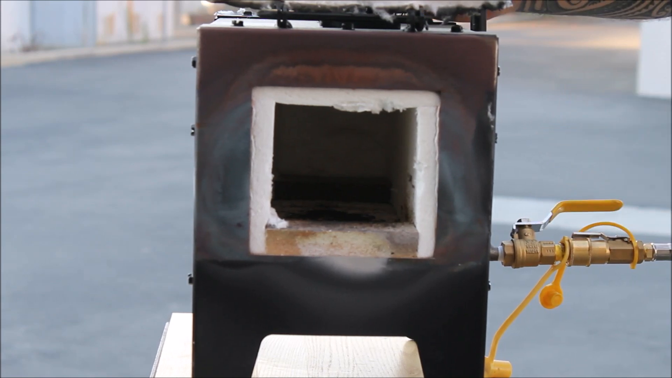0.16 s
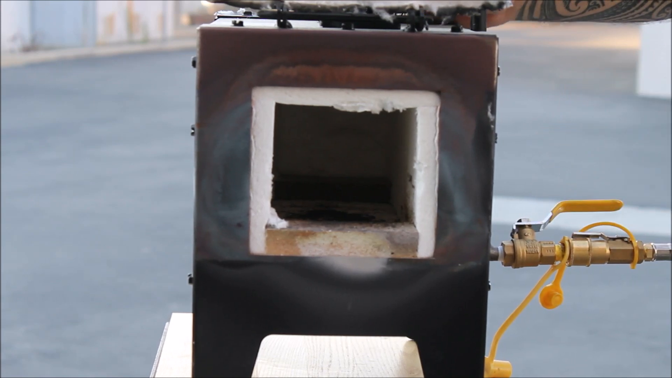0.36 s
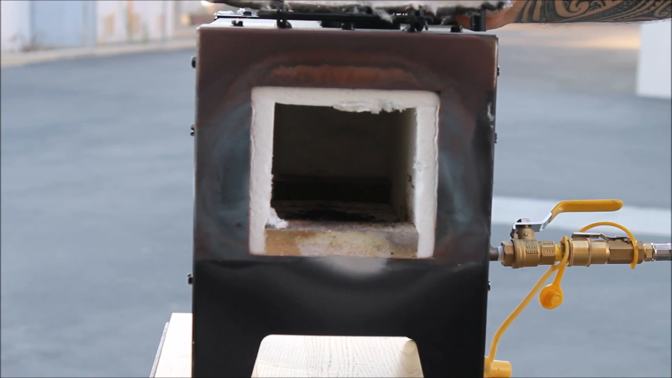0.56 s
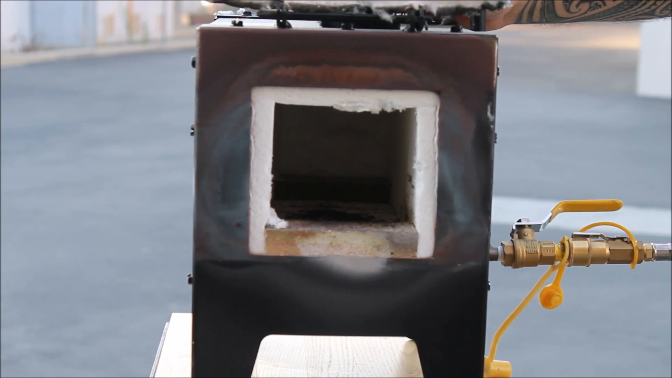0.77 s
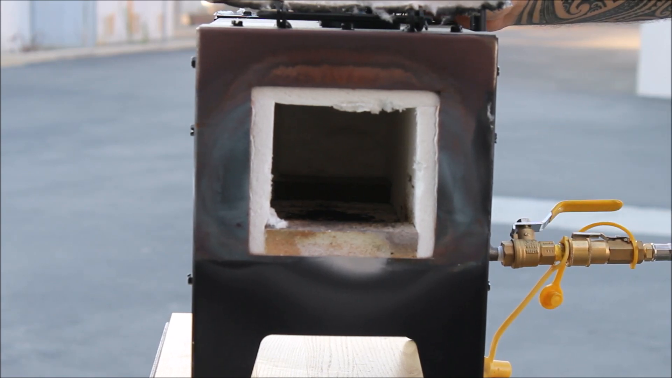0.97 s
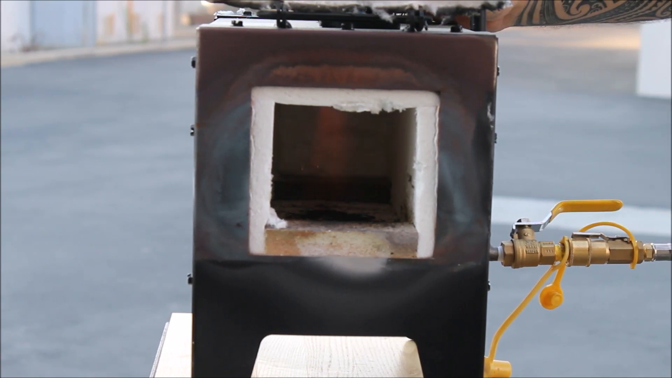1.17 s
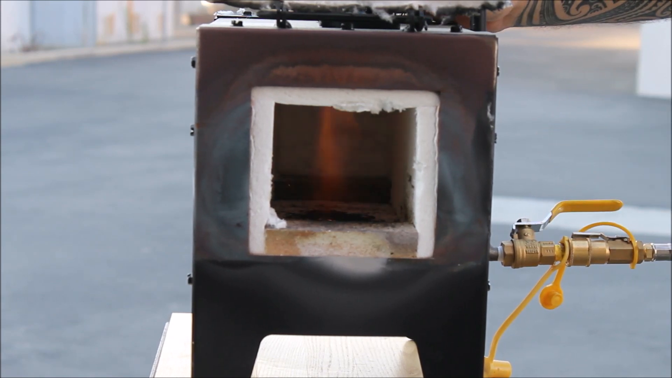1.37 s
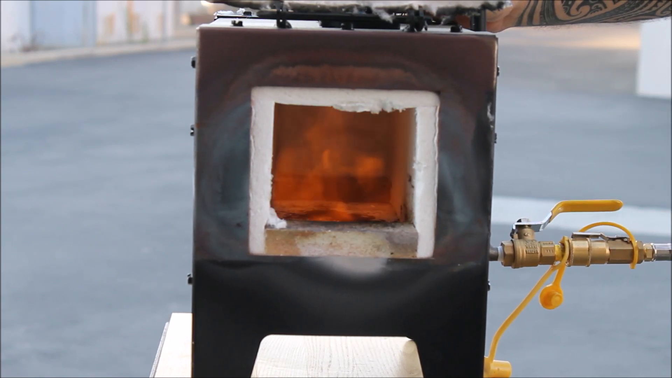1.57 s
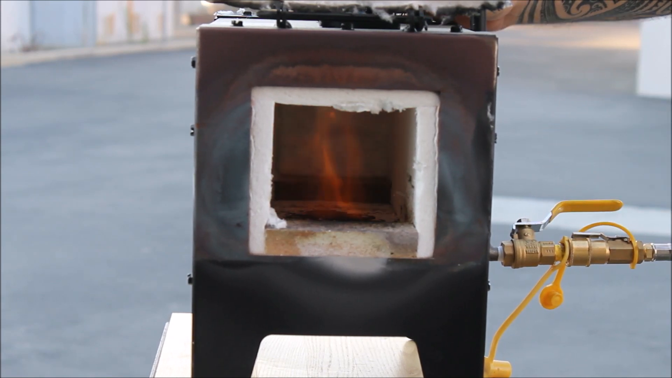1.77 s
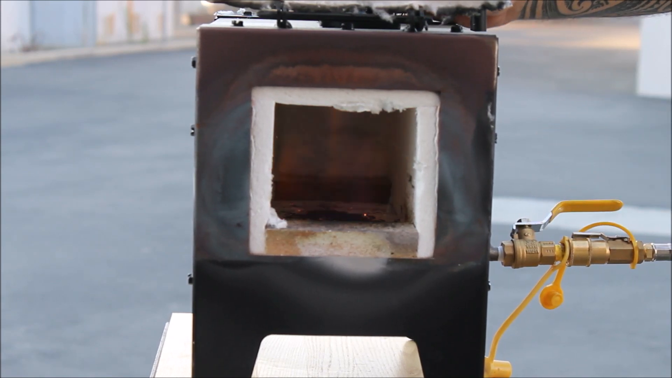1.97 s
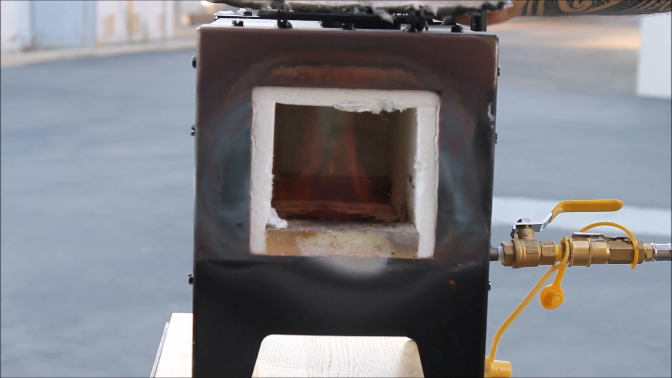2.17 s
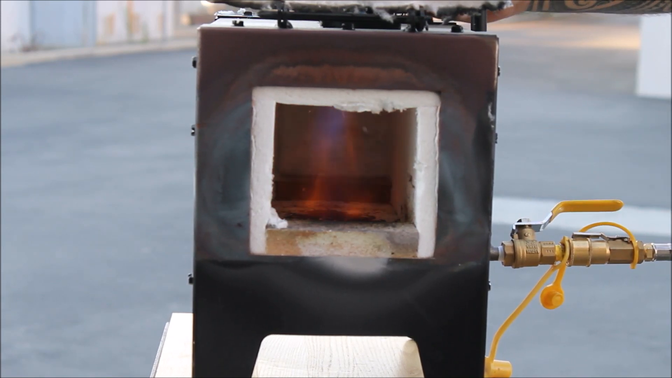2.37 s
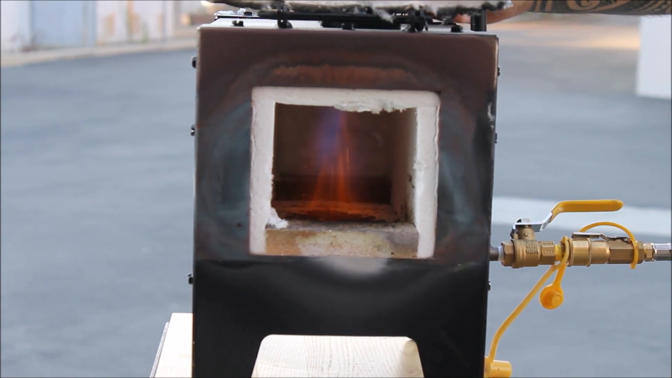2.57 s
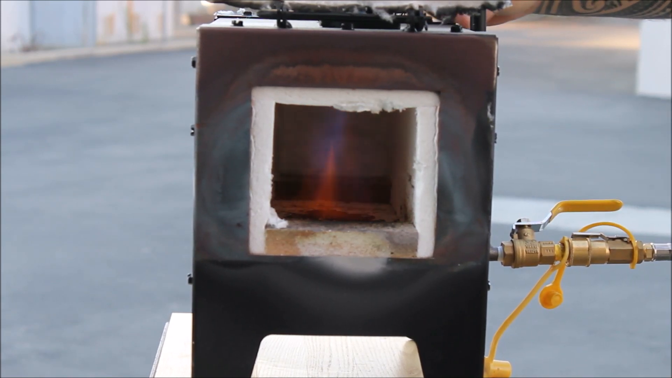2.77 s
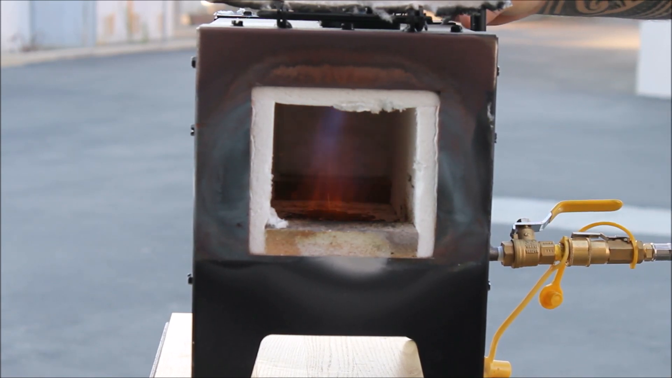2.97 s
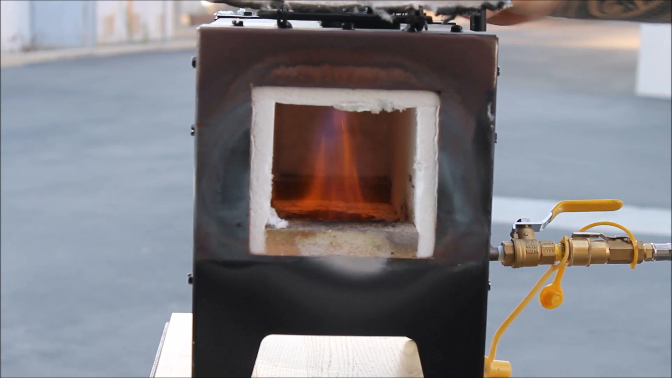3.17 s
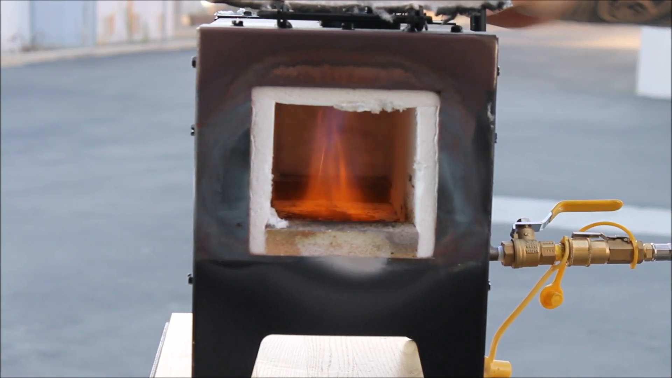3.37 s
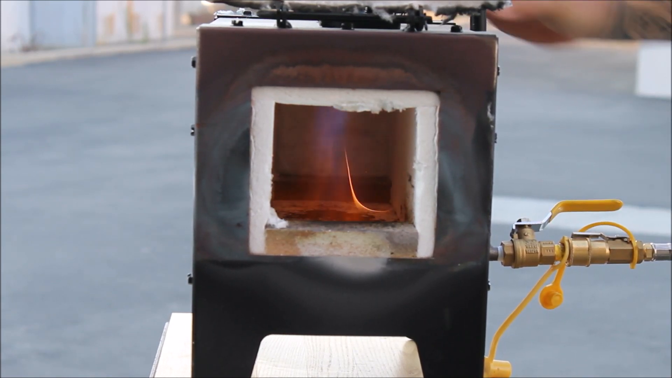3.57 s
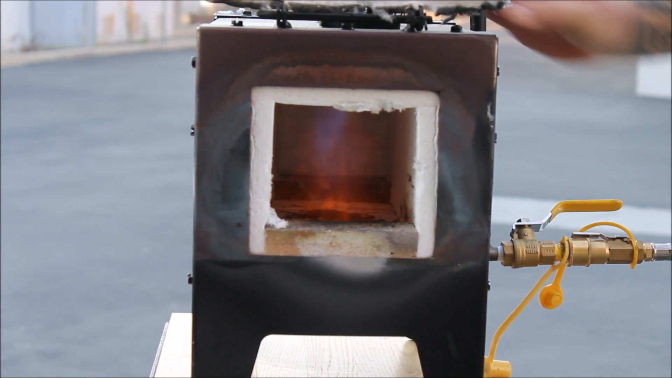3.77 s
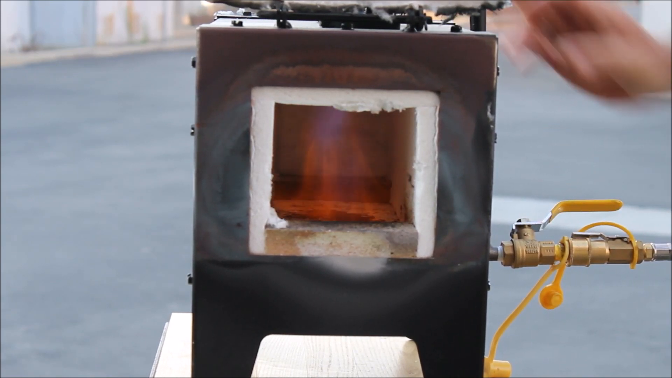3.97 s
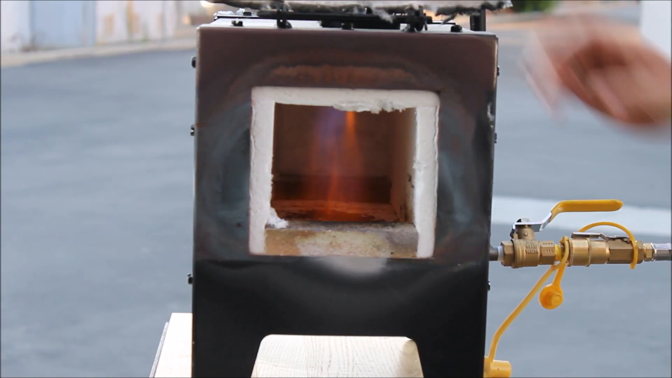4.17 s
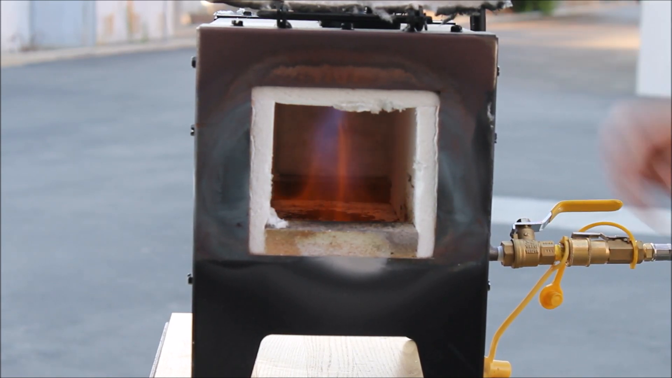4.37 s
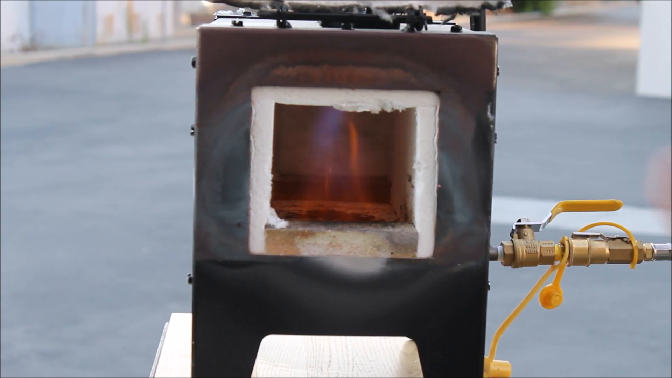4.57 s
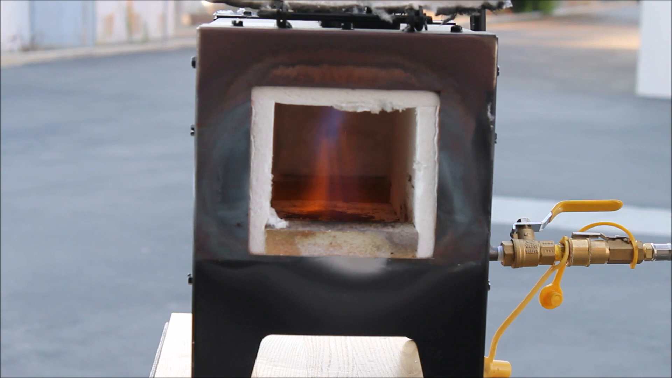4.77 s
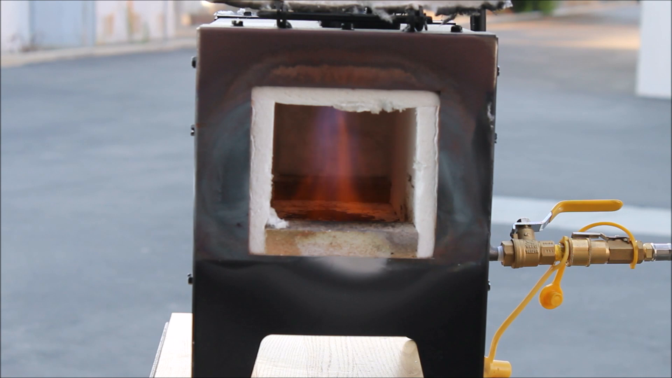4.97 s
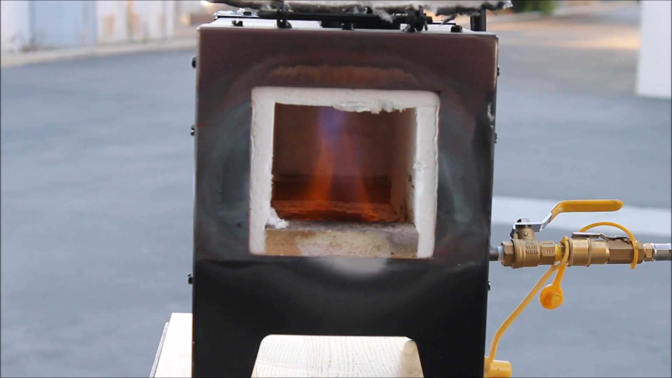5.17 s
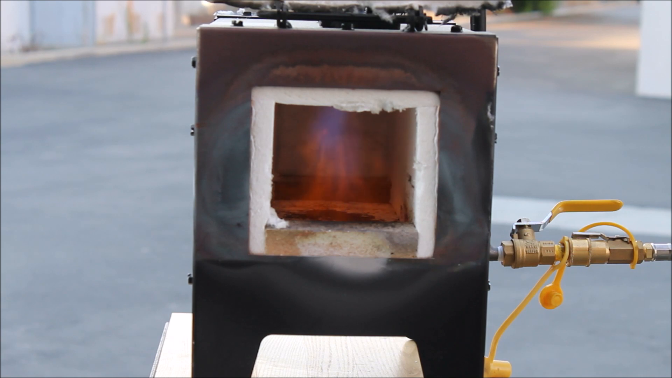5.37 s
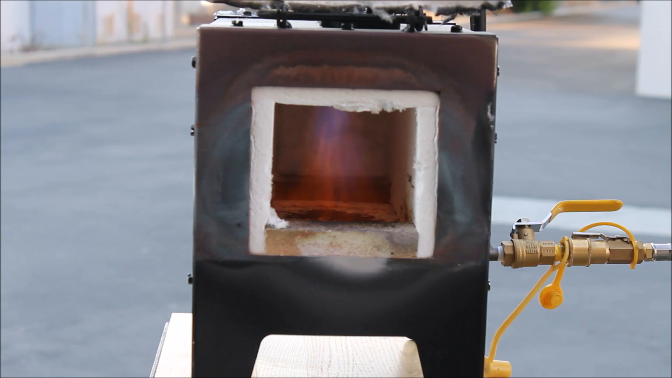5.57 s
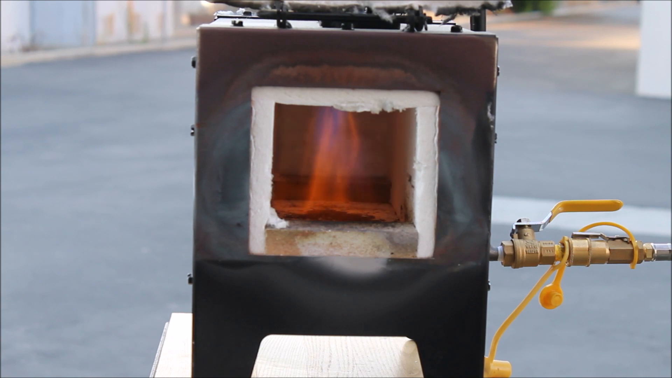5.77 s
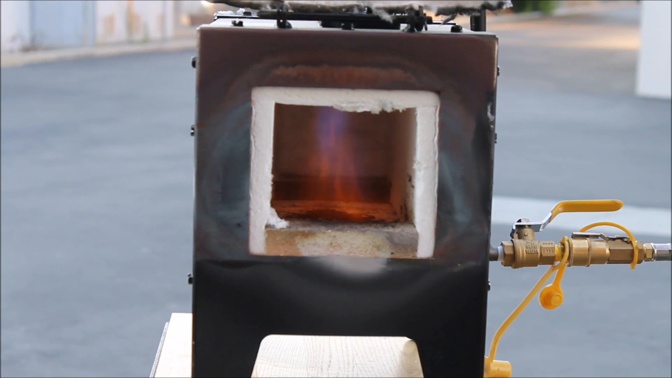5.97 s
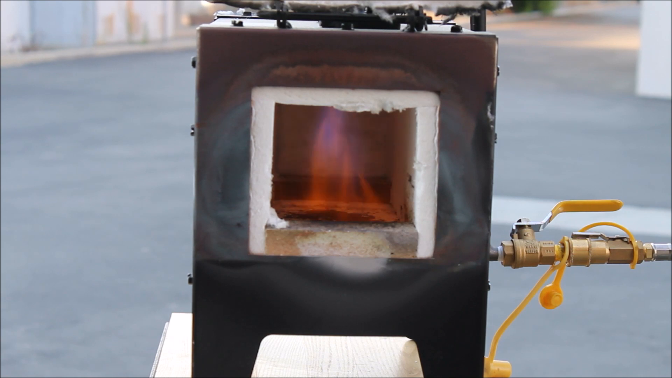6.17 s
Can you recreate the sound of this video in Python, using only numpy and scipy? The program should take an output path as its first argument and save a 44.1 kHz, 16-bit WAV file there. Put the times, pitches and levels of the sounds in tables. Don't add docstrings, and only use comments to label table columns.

```python
import sys
import numpy as np
from scipy import signal
from scipy.fft import rfft, irfft, next_fast_len
from scipy.io import wavfile
from scipy.ndimage import uniform_filter1d, map_coordinates

SR = 44100
rng = np.random.default_rng(int(sys.argv[2]) if len(sys.argv) > 2 else 0)


def ratio(d):
    e = np.asarray(d, float) / 20
    return 10 ** e


def put_to_file(sound):
    columns = np.atleast_2d(sound).T
    safe = np.clip(columns, -1, 1)
    whole_steps = np.round(safe * 32767)
    wavfile.write(sys.argv[1], SR, whole_steps.astype(np.int16))


N = 273861


def unit(x):
    return x / np.sqrt(np.mean(x ** 2) + 1e-20)


def along(points, hz):
    f, v = np.transpose(points)
    return np.interp(np.log(hz + 1), np.log(f + 1), v)


def curves(rows):
    s, *columns = np.transpose(rows)
    t = np.arange(N) / SR
    return [uniform_filter1d(np.interp(t, s, column), size=300) for column in columns]


def wobble(rate):
    knots = rng.standard_normal(int(N * 60 / SR) + 4)
    return map_coordinates(knots, [np.arange(N) * min(rate, 60) / SR])


def filtered(x, response):
    m = next_fast_len(len(x) + SR // 2)
    return irfft(rfft(x, m) * response(np.fft.rfftfreq(m, 1 / SR)), m)[:len(x)]


def modes(table, f):
    total = 0
    for k, (centre, width, db) in enumerate(table):
        damping = 1j * f * width
        total = total + (-1) ** k * ratio(db) * damping / (centre * centre - f * f + damping)
    return total


def noise(response, even=0.):
    x = filtered(rng.standard_normal(N), response)
    envelope = np.abs(signal.hilbert(unit(x), next_fast_len(N))[:N])
    return unit(x / (envelope + .25) ** np.clip(even, 0, 1))


# f/Hz, density level/dB per Hz
JET_SPECTRUM = [(20, -11), (60, -13), (100, -4), (400, -8), (700, -10.5), (2000, -19.5), (5000, -25),
                (7800, -26.5), (9300, -33.5), (10000, -42.5), (11000, -43.5), (13000, -53.5), (15400, -63),
                (15900, -76.5), (22000, -95), (30000, -140)]
# f/Hz, width/Hz, level/dB
WHISTLE = [(5790, 200, 0)]
# f/Hz, width/Hz, level/dB
OVERTONES = [(8070, 260, 0), (11600, 300, -12)]


def gas(hiss_db, whistle_db, slow, flutter_db, overtone_db):
    hiss = noise(lambda f: ratio(along(JET_SPECTRUM, f * slow)))
    hiss += ratio(overtone_db) * noise(lambda f: modes(OVERTONES, f * slow) ** 2)
    whistle = noise(lambda f: modes(WHISTLE, f * slow) ** 2, even=.6)
    whistle = filtered(whistle, lambda f: modes([(WHISTLE[0][0], 500, 0)], f * slow))
    hiss_gain = ratio(hiss_db + 4.5 + flutter_db * wobble(30 / slow))
    whistle_gain = ratio(whistle_db + 2.5 + 2.6 * wobble(70 / slow))
    return hiss_gain * hiss + whistle_gain * whistle


# t/s, level/dB
WHISTLING = [(.89, -58), (1.06, -43), (1.28, -61.5), (1.45, -46), (2.1, -51), (2.8, -50), (3.02, -52.5),
             (3.7, -55), (4.14, -62), (4.4, -55), (4.68, -46.5), (4.8, -54.5), (5.1, -51.5), (5.4, -45),
             (5.9, -49), (6.21, -50.5)]


def slowed_whistle_db():
    return curves(WHISTLING)[0]


SLOWED_HISS_DB, SWELL_DB, SWELL_S = -35.5, 2.5, 1.2
DUCK_DB, DUCK_FROM_S, DUCK_TAKES_S = 6, 1.9, 0.38
HISS_FOLLOWS, STEADY_WHISTLE_DB = 0.087, -50.5


def slowed_hiss_db():
    t = np.arange(N) / SR
    swell = SWELL_DB * np.clip((t - SWELL_S) / .1, 0, 1)
    ducked = np.clip((t - DUCK_FROM_S) / DUCK_TAKES_S, 0, 1)
    drift = HISS_FOLLOWS * uniform_filter1d(slowed_whistle_db() - STEADY_WHISTLE_DB, size=SR // 3)
    return SLOWED_HISS_DB + swell + ducked * (drift - DUCK_DB)


SPARK_T60, REBOUND_T60, ECHO_T60 = .006, .03, .04
# t/s, peak level/dB, f/Hz
SNAPS = [(1.053, -33, 1440), (1.226, -29.5, 1440), (1.272, -19.5, 1700), (1.276, -16.5, 1800),
         (1.2787, 3, 1914), (1.2828, -1.5, 1712), (1.2887, -3, 1750), (1.296, -9.5, 1400),
         (1.3043, -11.5, 1420), (1.317, -25.5, 1500), (1.326, -11, 1700), (1.345, -24, 1400),
         (1.358, -17.5, 1400), (1.379, -11, 1700), (1.3936, -24, 1700), (1.4279, -22, 1204),
         (1.4565, -32, 1410), (1.4767, -30.5, 1220), (1.544, -17.5, 1410), (1.568, -26.5, 1374),
         (1.7994, -28.5, 1370), (1.877, -19.5, 1400), (1.909, -22, 1500), (1.9744, -26.5, 1450),
         (2.3877, -27, 2013)]
# f/Hz, width/Hz, level/dB
IGNITER = [(343, 83, 2), (993, 100, -8.5), (1167, 61, -5.5), (1430, 380, -5), (1750, 360, -2.5),
           (1878, 290, -4.5), (2520, 250, -16.5), (3000, 220, -21)]


def igniter():
    out = np.zeros(N + SR)
    t = np.arange(SR // 5) / SR
    for s, db, hz in SNAPS:
        far = db < -16
        if far:
            t60, rise_s, direct, width = ECHO_T60, .0015, .06, 450
        else:
            t60 = SPARK_T60 if db > 0 else REBOUND_T60
            rise_s, direct, width = .0003, .4, 800
        blow = ratio(-60 * t / t60) * rng.standard_normal(len(t)) * np.minimum(t / rise_s, 1)
        blow[0] = 0 if far else -9
        ring = filtered(blow, lambda f: modes(IGNITER, f) * (direct + modes([(hz, width, 0)], f)))
        out[round(s * SR):][:len(t)] += ratio(db) * ring / np.abs(ring).max()
    return out[:N]


# f/Hz, t60/s
YARD = [(300, .4), (800, 0.32), (1400, 0.6), (2200, 0.49), (3500, 0.54)]


def yard(x):
    hz, t, z = signal.stft(rng.standard_normal(SR), SR, nperseg=256)
    decay = ratio(-60 * t / along(YARD, hz)[:, None])
    tail = signal.istft(z * decay, SR, nperseg=256)[1]
    return signal.fftconvolve(np.pad(x, (400, 0)), tail / np.linalg.norm(tail))[:N]


# t/s, level/dB, lowest f/Hz, highest f/Hz
CRACKS = [
    (1.2796, -13, 4000, 5950),
    (1.291, -47, 4170, 6280),
    (1.3295, -49, 3330, 4850),
    (1.380, -48, 3500, 5100),
    (1.993, -47.5, 3000, 5800),
]


def cracks():
    out = np.zeros(N)
    u = np.arange(-128, 128) / SR
    for s, db, low_hz, high_hz in CRACKS:
        click = np.sinc((high_hz - low_hz) * u) * np.cos(np.pi * (low_hz + high_hz) * u)
        out[round(s * SR) - 128:][:len(u)] += ratio(db) * click * np.hanning(len(u))
    return out


# t/s, level/dB
FLAME = [(1.29, -34), (1.36, -22), (1.62, -43), (1.67, -21), (1.81, -23), (1.95, -26.5), (1.99, -13.5),
         (2.21, -24), (2.4, -16.5), (2.99, -13), (3.3, -14.5), (3.77, -13), (4.1, -15.5), (4.3, -13.5),
         (4.9, -13), (5.24, -15), (5.8, -14), (6.21, -14.5)]


def burning_db():
    return curves(FLAME)[0]


STEADY_DB, SETTLE_S = -14, .4


def settled():
    power = uniform_filter1d(ratio(burning_db() - STEADY_DB) ** 2, size=round(SETTLE_S * SR))
    return 10 * np.log10(np.abs(power) + 1e-6)


LICK_DB, LICK_FOLLOWS = -35.5, 0.61
WHUMP_DB, WHUMP_S = 18.5, 0.044
# f/Hz, density level/dB per Hz
ROAR = [(12, -25.5), (25, -6.5), (45, 7), (65, 0), (95, 1.5), (125, -8), (170, -22.5), (220, -36),
        (400, -160)]
# f/Hz, density level/dB per Hz
FLUTTER = [(100, -62.5), (180, 0.5), (260, -2.5), (330, -5), (400, -9), (600, -14), (1200, -31),
           (2500, -81.5), (5000, -160)]
# delay/s, then a list of f/Hz, level/dB
GROUND = (0.014525, [(30, -13), (100, -1.5), (200, -7.5), (400, -7.5), (1000, -20.5)])


def flame():
    since = np.arange(N) / SR - FLAME[0][0]
    lit = since > 0
    flutter_db = LICK_DB + LICK_FOLLOWS * settled() + WHUMP_DB * np.exp(-np.abs(since) / WHUMP_S)
    dips, busy = puffs()
    roar_gain = ratio(burning_db() - 1.95 - 1.7 * busy + .6 * wobble(9.7))
    roar = roar_gain * noise(lambda f: ratio(along(ROAR, f)), even=.5)
    flutter_gain = ratio(flutter_db + 1.4 * busy + 0.65 * wobble(12))
    flutter = flutter_gain * noise(lambda f: ratio(along(FLUTTER, f)))
    late, echo = GROUND

    def ground_and_microphone(f):
        reflection = ratio(along(echo, f)) * np.exp(-2j * np.pi * f * late)
        return (1 + reflection) * 1j * f / (6 + 1j * f)

    return filtered(lit * (roar + flutter) + dips, ground_and_microphone)


# t/s, level/dB, width of the pressure dip/ms
PUFFS = [(2.3094, -13.5, 7.5), (2.376, -8, 6.8), (2.4379, -8, 6.5), (2.632, -7, 6.2), (2.7766, -8.5, 7.5),
         (2.874, -9.5, 8.5), (2.9751, -4.5, 5.8), (3.0506, -5, 7.1), (3.249, -9, 6.2), (3.3089, -4.5, 5.95),
         (3.4013, -4, 10), (3.5167, -3.5, 8.2), (3.5785, -8.5, 11.8), (3.6886, -9, 6.5), (3.7767, -4, 8.6),
         (3.8928, -8, 7.4), (4.059, -8.5, 7.1), (4.198, -7, 8.6), (4.279, -6, 7.6), (4.542, -12.5, 10.3),
         (4.6177, -6.5, 8.2), (4.6792, -5, 6.8), (4.9199, -2.5, 6.8), (5.1623, -6, 7), (5.3055, -4.5, 8),
         (5.6003, -6.5, 9.4), (5.722, -5.5, 6.2), (5.7937, -2.5, 7.7), (5.8752, -3, 12), (6.096, -8.5, 6.3),
         (1.3073, -12.5, 5.4), (1.341, -16.5, 6), (1.3686, -11.5, 17), (1.414, -14.5, 12),
            (1.6738, -8.5, 6.5), (1.7154, -13.5, 11), (1.746, -13, 15), (1.9904, -0.2, 7.4),
            (2.045, -7.5, 20), (2.068, -12, 7.7), (2.2418, -13, 8.2)]


def puffs():
    half = SR // 10
    u = np.arange(-half, half) / SR
    dips, busy = np.zeros(N), np.zeros(N)
    for s, db, width_ms in PUFFS:
        start = round(s * SR) - half
        turn = 1000 * u / width_ms
        bell = np.exp(-(turn / (0.96 + 0.25 * np.tanh(turn))) ** 2)
        dips[start:][:2 * half] -= ratio(db) * np.cos(np.pi * turn) * bell
        busy[start:][:2 * half] += np.exp(-((u - .005) / 0.053) ** 2)
    return dips, busy


# t/s, level/dB, t60/s
FLASHES = [
    (1.70, -13, .5),
    (1.80, -10, .5),
    (1.980, 2.5, .25),
    (2.045, -2.5, .4),
    (2.10, -6, .25),
]
# f/Hz, width/Hz, level/dB
TUBE = [(212, 44, 0), (417, 40, -1), (565, 44, -3)]


def tube_flashes():
    t = np.arange(SR // 3) / SR
    kicks = np.zeros(N)
    for s, db, t60 in FLASHES:
        kicks[round(s * SR):][:len(t)] += ratio(db - 60 * t / t60) * rng.standard_normal(len(t))
    return filtered(kicks, lambda f: modes(TUBE, f) ** 2)


SLOW = 4
MUTE_FROM_S, MUTE_TO_S = .8592, .8921
FAST_HISS_DB, FAST_WHISTLE_DB = -34.5, -46.5


def scene():
    t = np.arange(N) / SR
    fast = gas(FAST_HISS_DB, FAST_WHISTLE_DB, 1, flutter_db=0.5, overtone_db=-21.5)
    jet = gas(slowed_hiss_db(), slowed_whistle_db(), SLOW, flutter_db=0.0, overtone_db=-32.0)
    snaps = igniter()
    treble = lambda f: signal.freqs(*signal.butter(5, 3300, analog=True), f)[1]
    spark = filtered(snaps + ratio(-10) * yard(snaps), treble)
    slowed = jet + ratio(-0.5) * spark + cracks() + flame() + tube_flashes()
    return ((t < MUTE_FROM_S) * fast + (t > MUTE_TO_S) * slowed)[None]


# t/s, holes above f/Hz, nothing above f/Hz, length/ms
DROPOUTS = [
    (.176, 3500, 9000, 28),
    (.24, 4500, 10000, 26),
    (.388, 4200, 9500, 28),
    (.698, 1800, 9000, 46),
    (.772, 3000, 10500, 24),
    (.838, 4500, 11000, 22),
]


def treble_dropouts(x):
    out = x.copy()
    for s, holes_hz, top_hz, length_ms in DROPOUTS:
        width = round(length_ms * SR / 1000)
        start = round(s * SR) - width // 2
        empty = rng.random(200) < .55
        lost = lambda f: (f > top_hz) | ((f > holes_hz) & empty[(f / 170).astype(int)])
        removed = filtered(x[start - width:start + 2 * width], lost)[width:2 * width]
        out[start:start + width] -= signal.windows.tukey(width, .7) * removed
    return out


def top_cut(x):
    return signal.sosfilt(signal.butter(12, 15650, fs=SR, output="sos"), x)


def record(dry):
    clipped = np.clip(treble_dropouts(dry[0]), -1, 1)
    mix = clipped + ratio(-101) * rng.standard_normal(N)
    return top_cut(mix[None])


dry = scene()
out = record(dry)
put_to_file(out)
```